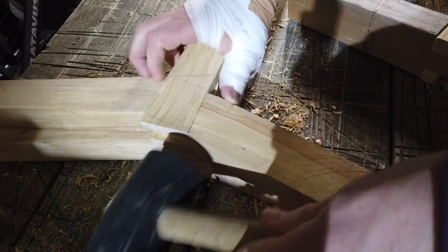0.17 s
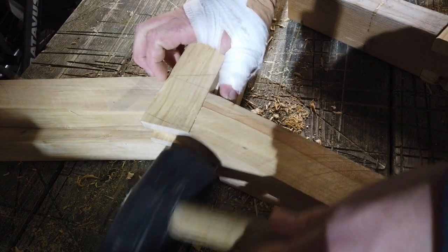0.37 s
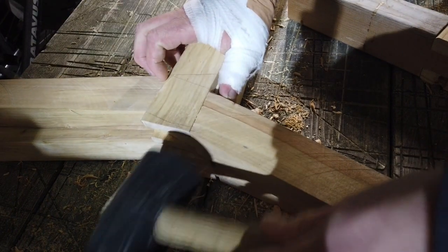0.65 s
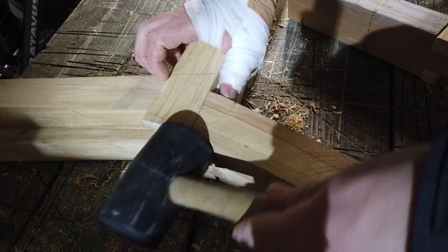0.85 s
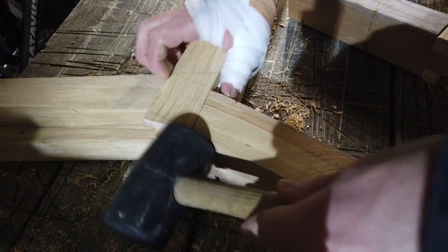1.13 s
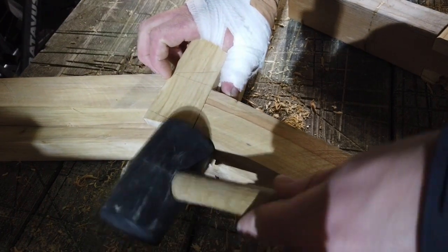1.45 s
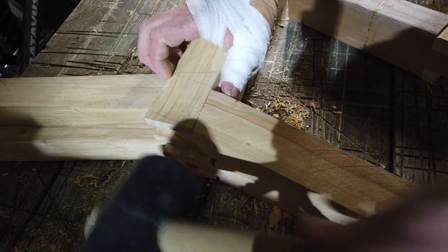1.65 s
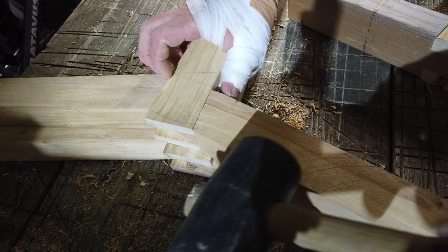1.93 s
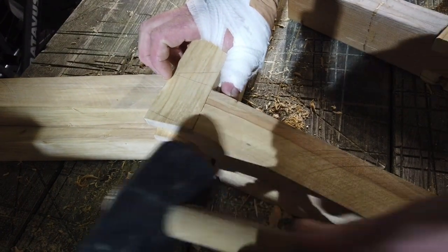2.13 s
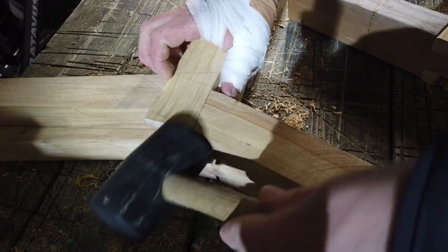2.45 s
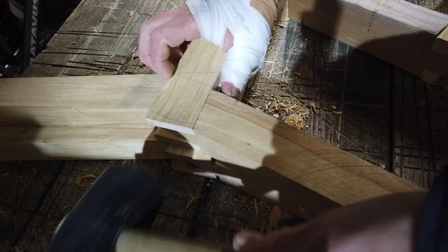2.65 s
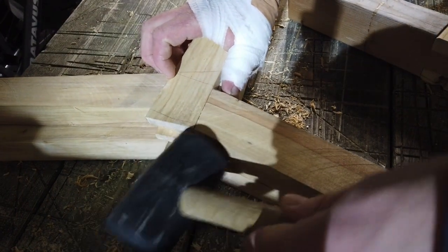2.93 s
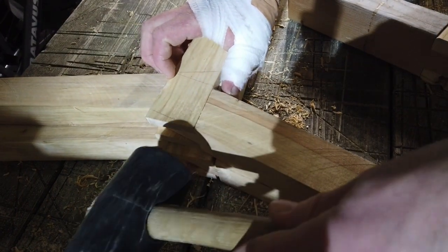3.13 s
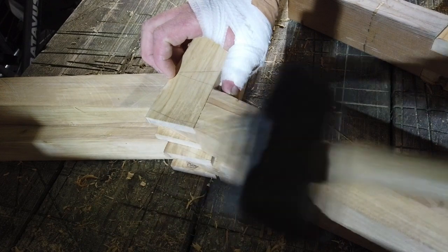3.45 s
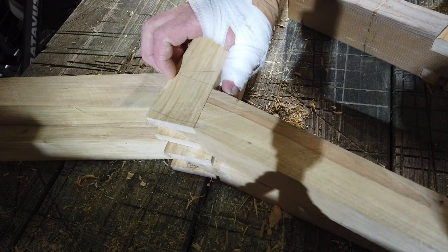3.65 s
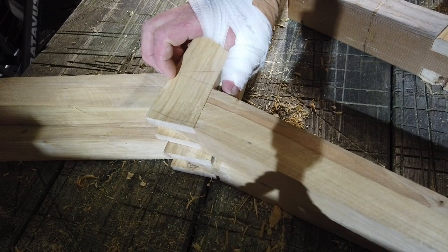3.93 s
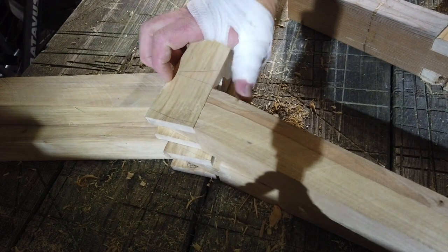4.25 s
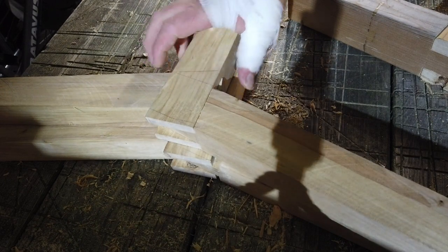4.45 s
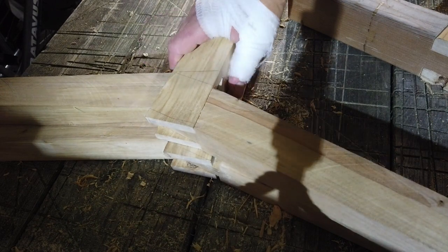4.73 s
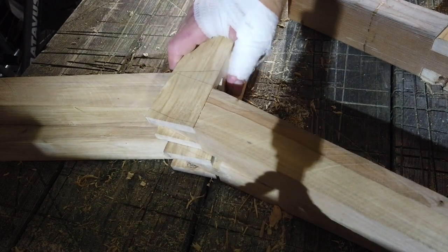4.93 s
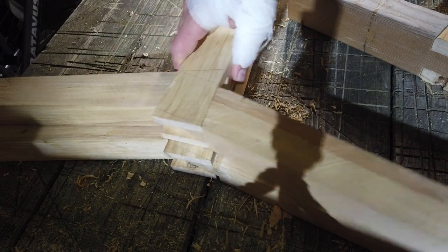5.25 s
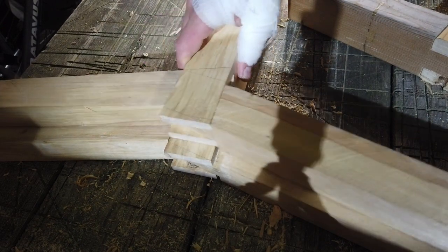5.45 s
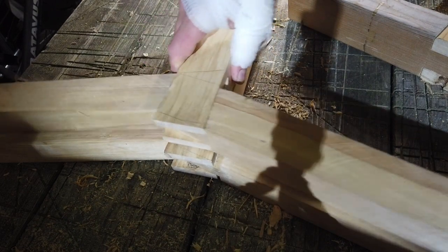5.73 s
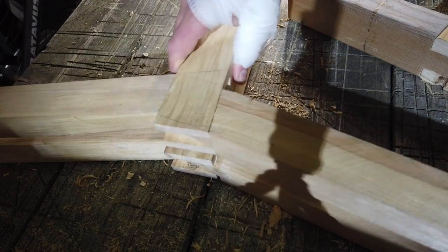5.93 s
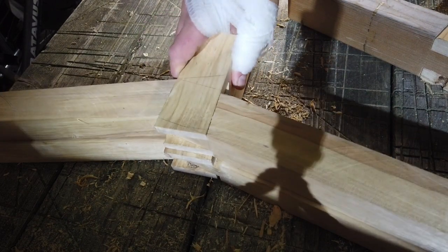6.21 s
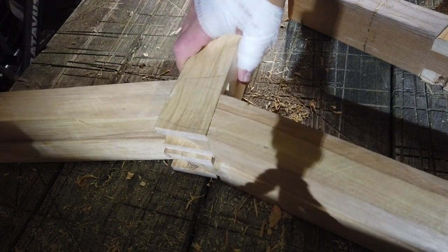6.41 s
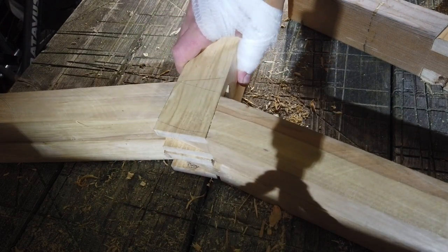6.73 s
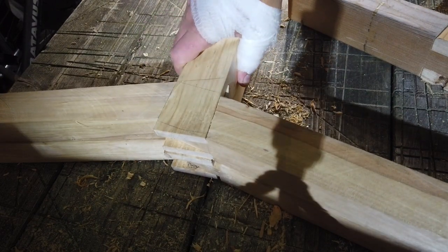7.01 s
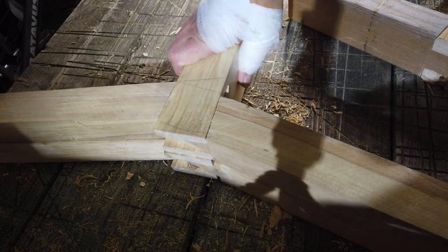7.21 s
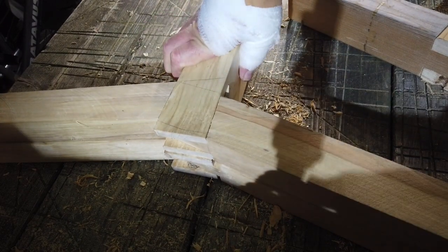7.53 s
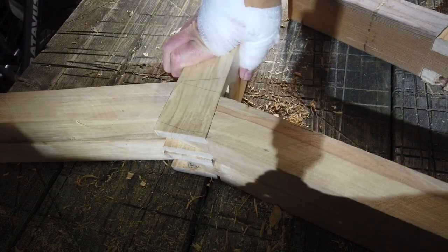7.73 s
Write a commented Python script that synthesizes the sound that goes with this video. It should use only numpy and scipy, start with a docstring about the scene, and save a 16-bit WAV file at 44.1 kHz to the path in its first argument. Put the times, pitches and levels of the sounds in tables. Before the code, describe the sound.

Close-up woodworking in a small, quiet workshop. A faint cloth rustle and low drag open, then a mallet drives a tight tenon into a frame: a softer knock at 0.14 s, then firm ones near 0.4, 0.65, 0.9, 1.2 and 1.5 s. Each is a short woody knock with a bench thud, gritty crack and bright snap that grows as the joint binds. Sleeve swishes and light ticks fill the gap; a softer but heavier-bodied blow at 2.5 s and a firm one at 2.95 s finish. A cloth swish passes at 3.5 s. At 4.1 s the frame thuds, clacking again at 4.5 s. Juddering drags and bumps run from 5 to 6 s, strongest about 5.5 s. It drops flat at 6.1-6.2 s in a loud double clack. Cloth swishes lead to a deep padded thump at 7.4 s, then faint rumble. Short reflections and faint metallic ringing follow the wood hits.

```python
"""A faint cloth rustle and a low drag over quiet room tone, then mallet blows drive a tight tenon into a frame.
Each blow layers a bouncing bench thud, ringing timber modes and a short stick-slip crack and snap.
Later the frame is shoved about and dropped back, with clacks, padded thumps and juddering scrapes.
Sleeve swishes are coloured noise that follows the arm's speed; folds of the jacket tick.
Decaying noise bands make the small workshop's reflections, and metal tools ring faintly along."""
import sys
import numpy as np
from scipy import signal
from scipy.fft import rfft, irfft, next_fast_len
from scipy.io import wavfile
from scipy.ndimage import uniform_filter1d

SR = 44100
rng = np.random.default_rng(int(sys.argv[2]) if len(sys.argv) > 2 else 0)


def wav_out(sig):
    """Save sig, one row per channel (or a flat mono array), as 16-bit PCM at SR to the path in sys.argv[1]."""
    wavfile.write(sys.argv[1], SR, np.round(np.clip(np.atleast_2d(sig).T, -1, 1) * 32767).astype(np.int16))


N = 347067  # samples
RING = np.arange(SR) / SR  # s, one second in which a contact dies away

# Colour of the room tone: f/Hz, relative level/dB
ROOM_TONE_COLOUR = [(12, -20), (20, 7.5), (61, -1.5), (284, -24), (365, -22), (843, -25), (969, -29.5),
                    (1600, -26.5), (3310, -31), (6290, -41), (11000, -37), (14500, -40.5), (15800, -42.5)]
ROOM_TONE_DB = -61.5
# Stereo width of handling noise and room tone: f/Hz, side against mid level/dB
NEAR_WIDTH = [(60, -11.5), (200, -15.5), (700, -10), (2400, -16), (4400, -9), (8000, -0.5), (15000, -9)]

# Shoves of the frame over the bench: t/s of top speed, speeding up/s, slowing down/s,
# rumble level/dB, scrape level/dB
SHOVES = [(0.04, 0.17, 0.15, -48, -62), (4.392, 0.016, .05, -58, -54), (5.05, .15, 0.21, -46, -76),
          (5.41, 0.13, 0.2, -45, -60), (5.54, 0.16, 0.078, -33.5, -54.5), (5.81, 0.41, 0.51, -41, -60),
          (6.429, .03, 0.096, -46, -63.5), (7.65, 0.75, 0.96, -53.5, -70.5)]
# Colour of the judder and of the gritty scrape: f/Hz, relative level/dB
RUMBLE_COLOUR = [(25, 8.5), (50, 2), (85, -1), (160, -9.5), (280, -23), (700, -75.5)]
SCRAPE_COLOUR = [(150, -17.5), (400, 2), (900, -8), (2500, -17), (6000, -33.5), (15000, -60)]
SPEED_POWER = 0.84  # a movement's loudness follows its speed to this power

# Arm movements that swish the sleeve: t/s of top speed, speeding up/s, slowing down/s, level/dB
SWISHES = [(0.08, .15, 0.38, -66.5), (1.875, 0.23, 0.16, -55), (2.15, 0.13, .25, -55.5),
           (3.495, 0.18, 0.35, -48.5), (4.149, 0.6, 0.47, -63), (4.979, 0.14, 0.11, -57),
           (5.58, 0.59, 0.91, -66), (5.89, 0.093, 0.086, -65), (6.919, 0.14, 0.21, -53),
           (7.209, .14, .33, -45.5), (7.46, 0.16, 0.33, -64), (7.83, 0.26, 0.27, -64)]
# Colour of the sliding cloth: f/Hz, relative level/dB
CLOTH_COLOUR = [(240, 1), (400, -9.5), (445, -6.5), (644, -1.5), (696, -10), (752, 3), (1050, -2.5),
                (1310, 1.5), (1920, -3.5), (2570, 2.5), (3140, 1), (6280, -9), (10900, -2.5), (14900, -6.5),
                (15800, -31.5)]

# The frame rocks and an edge knocks on the bench: t/s, knock level/dB, hardness/dB per octave,
# thud level/dB, thud f/Hz
BUMPS = [(0.009, -58.5, 1.5, -40, 183), (0.966, -38, -3, -37.5, 205), (1.582, -37.5, 1.1, -38.5, 62),
         (2.588, -42.5, 0.3, -36.5, 83), (4.117, -35, 0, -17.5, 159), (4.128, -46.5, 5.5, -27.5, 280),
         (4.164, -49, 5, -30, 128), (4.243, -36, 1.5, -34.5, 138), (4.508, -22, -1.5, -22.5, 146),
         (4.955, -59.5, 4, -47, 62), (5.011, -54.5, 0, -46, 62), (5.107, -58.5, 5, -41, 98),
         (5.377, -46, -0.15, -36.5, 86), (5.486, -39, 1.5, -29.5, 78), (5.518, -27.5, -1.7, -30, 167),
         (5.718, -36, 3.5, -47, 148), (5.835, -62, 6, -38.5, 165)]
# The frame falls flat, one end and then the other: same columns as BUMPS
DROP = [(6.120, -19.5, 1.5, -20.5, 167.3), (6.187, -28, 3, -25, 198), (6.198, -21.5, -2.2, -20.5, 112)]
# Mallet blows: t/s, force/dB against a full blow, thud level/dB, thud f/Hz
BLOWS = [(0.142, -7, -30, 161), (0.388, 0.5, -28, 127), (0.639, 0, -29, 126), (0.915, 1, -26, 122),
         (1.217, 1, -27.5, 110), (1.529, -0.5, -28.5, 138), (2.520, -6, -21.5, 114.5),
         (2.943, -0.5, -28.5, 205)]

# Resonances of bench and frame, retuned a little at each strike: f/Hz, relative level/dB, t60/s
BENCH_MODES = [(30.2, -22.5, 1), (44.56, -4, 0.69), (82.85, -2, 0.38), (106, -12, 0.073),
               (127, -2.5, 0.049), (161.7, 0, .26), (181.3, -7.5, 0.38), (203, -2.5, 0.17),
               (218.4, -14, 0.065)]
TIMBER_MODES = [(331, -8, 0.23), (396, -3.5, 0.21), (428.4, 1.5, 0.072), (478.3, -1.5, 0.092),
                (591, -1.5, 0.15), (631, -7, .12), (743, -14, .08), (814.3, 3, 0.077), (1120, -10, 0.037),
                (1262, -3, 0.11), (1444, -8.5, 0.089), (1520, -2.5, 0.22), (1464, 3, 0.092),
                (1830, -7, .09), (1924, -14.5, 0.24), (2306, 2, 0.1), (2610, -9.5, 0.069), (2810, -10, 0.2),
                (3270, -5, .05), (3500, -13, 0.04), (4180, 4, .04)]
# Bending waves along the planks: f/Hz, relative level/dB
PLANK_COLOUR = [(40, -7), (100, -1.5), (190, -4.5), (260, -14.5), (400, -25), (900, -50)]
# Timber knock, before hardness tilts it: f/Hz, relative level/dB
KNOCK_COLOUR = [(100, -25.5), (200, -3.5), (380, 2.5), (800, -2), (1400, -8.5), (2200, -12), (5000, -52.5),
                (15000, -82.5)]
# Loose wood clacking on the bench: f/Hz, relative level/dB
CLACK_COLOUR = [(500, -19.5), (1100, -7.5), (2300, 1.5), (3100, -4), (4000, -16.5), (5500, -36.5),
                (14000, -66)]
# Brighter crack of the joint, with a bite from the short tenon: f/Hz, relative level/dB
CRACK_COLOUR = [(600, -33), (1450, 3), (1850, 0), (2320, -0.5), (2650, -3), (3000, -4), (3270, 0.5),
                (3650, -9.5), (4060, -11.5), (5500, -27.5), (10000, -50.5)]
# Snap of the rubbing fibres: f/Hz, relative level/dB
SNAP_COLOUR = [(2000, -18), (4200, 1.5), (5500, -2), (8000, -8.5), (11000, -6), (16000, -21.5)]

# Levels of a full blow, the snap once the joint has bound
BLOW_KNOCK_DB, BLOW_CRACK_DB, BLOW_SNAP_DB = -26.5, -27.5, -37.5
# The tenon binds as it goes in, so the snap grows: shortfall at the start (dB), time to bind (s)
LOOSE_DB, BIND_S = -16, 0.17
# Loose wood: clack and snap against the knock (dB), and their rise with hardness (dB per dB/octave)
CLACK_DB, CLACK_PER_HARDNESS = -11.5, 2.96
EDGE_SNAP_DB, FLAT_SNAP_DB, SNAP_PER_HARDNESS = -20.5, -41.5, 4.17
# Heavier thuds chatter more: thud where chatter equals the slip before grip (dB), slope (dB per dB)
HEAVY_THUD_DB, CHATTER_GROWTH = -31, 0.58
# Heavier landings are shorter: contact at HEAVY_THUD_DB (s), dB of thud that halve it, longest (s)
CONTACT_S, CONTACT_HALVING_DB, LONGEST_CONTACT_S = 0.0052, 10, 0.009

# Workshop reverberation: f/Hz, relative level/dB, t60/s
ROOM = [(40.4, 8.5, 0.96), (83, -11, 0.44), (186, -9, 0.41), (500, -8, 0.16), (1500, -14.5, 0.31),
        (4000, -14.5, 0.25), (12000, -11, 0.024)]
# Stereo spread of reflections and of the direct sound's phase: f/Hz, relative level/dB
WIDTH = [(50, -2.5), (110, -12.5), (200, -16), (380, -12.5), (700, -12.5), (1300, -5.5), (2500, -2.5),
         (5000, 1.5), (12000, 5.5)]
# Metal tools nearby, ringing in sympathy: f/Hz, relative level/dB, t60/s
TOOL_MODES = [(1070, -9, 1), (1710, 1, 0.55), (2484, -0.5, .55), (2495, 5.5, 0.17)]

# Folds of the jacket flip over: t/s, level/dB
FOLDS = [(1.867, -51), (3.448, -47.5), (3.586, -52), (6.986, -51)]
# Dull tick of a fold: f/Hz, relative level/dB
FOLD_COLOUR = [(150, -19), (400, 0.5), (850, 1.5), (2200, -7.5), (5000, -29)]
# Padded thumps against the bench: t/s, level/dB, f/Hz, bounce/cycles
THUMPS = [(4.119, -24.5, 302, 0.37), (5.873, -38.5, 68.6, 1), (6.317, -37, 52.3, 1.6),
          (7.395, -15.5, 73.7, 0.94), (7.417, -30.5, 190, 0.77), (7.418, -39.5, 357, 0.3),
          (7.64, -49.5, 78.6, 1.4), (7.718, -48, 74.6, 0.92)]


def undb(db):
    """Decibels to gain."""
    return 10 ** (np.asarray(db) / 20)


def lookup(points, hz, axis=1):
    """Read a column of a table along log frequency."""
    table = np.array(points, float)
    return np.interp(np.log(np.maximum(hz, 1)), np.log(table[:, 0]), table[:, axis])


def colour(x, points):
    """Minimum-phase filter with the given f/Hz, level/dB shape, so nothing sounds ahead of its cause."""
    size = 2 * next_fast_len(x.shape[-1])
    gain = undb(lookup(points, np.fft.rfftfreq(size, 1 / SR)))
    cepstrum = irfft(np.log(gain))
    # folding the cepstrum forward makes the filter causal
    cepstrum[1:size // 2] *= 2
    cepstrum[size // 2 + 1:] = 0
    response = np.exp(rfft(cepstrum))
    return irfft(rfft(x, size) * response)[..., :x.shape[-1]]


def unit(x):
    """Scale to rms 1."""
    return x / np.sqrt(np.mean(x ** 2))


def loudest(x, db, size=882):
    """Scale so that the loudest 20 ms have this level."""
    power = uniform_filter1d(x ** 2, size, mode="constant")
    return x * undb(db) / np.sqrt(power.max())


def through(x, response):
    """Pass a sound through an impulse response."""
    return signal.fftconvolve(x, response)[:len(x)]


def add(track, s, sound):
    """Mix a sound into a track at time s."""
    start = max(int(s * SR), 0)
    track[start:start + len(sound)] += sound[:N - start]


def walk(rate):
    """Smoothed random drift with a spread near 1 and about this many steps a second."""
    k = int(SR / rate)
    steps = np.repeat(rng.standard_normal(N // k + 1), k)
    smooth = uniform_filter1d(uniform_filter1d(steps, k), k)
    return unit(smooth)[:N]


def stereo_noise(points):
    """Coloured noise whose two channels differ by NEAR_WIDTH."""
    mid, side = colour(rng.standard_normal((2, N)), points)
    spread = colour(side, NEAR_WIDTH) * np.array([[1], [-1]])
    return (mid + spread) / np.std(mid)


def room_tone():
    """Quiet coloured noise of the workshop, its level drifting slowly."""
    return stereo_noise(ROOM_TONE_COLOUR) * undb(ROOM_TONE_DB + 1.5 * walk(3))


def movement(s, rise_s, fall_s):
    """Gain of one movement, which speeds up smoothly from rest and slows to rest again."""
    t = np.arange(N) / SR - s
    progress = np.clip(np.where(t < 0, -t / rise_s, t / fall_s), 0, 1)
    return np.sinc(progress) ** (2 * SPEED_POWER)


def drag():
    """The frame judders over the planks and crunches grains of sawdust."""
    judder = sum(undb(db) * movement(*timing) for *timing, db, _ in SHOVES)
    scrape = sum(undb(db) * movement(*timing) for *timing, _, db in SHOVES)
    rumble = stereo_noise(RUMBLE_COLOUR) * judder * undb(2 * walk(20))
    # uneven sample levels make the noise gritty
    grains = rng.standard_normal(N) * np.exp(0.82 * rng.standard_normal(N))
    crunch = unit(colour(grains, SCRAPE_COLOUR))
    return rumble + crunch * scrape * undb(2.3 * walk(70))


def sleeve():
    """Smooth jacket cloth slides over itself, its weave hissing with a slight flutter."""
    swish = sum(undb(db) * movement(*timing) for *timing, db in SWISHES)
    return stereo_noise(CLOTH_COLOUR) * swish * undb(0.56 * walk(70))


def ring(modes):
    """Decaying modes of unit energy; pitch and weight vary with the spot that is struck."""
    hz, db, t60 = np.array(modes, float).T[:, :, None]
    shift, weight = rng.standard_normal((2, len(modes), 1))
    hz = hz * (1 + 0.01 * shift)
    db = db + 3 * weight
    decay = np.exp(-np.log(1000) * RING / t60)
    y = np.sum(undb(db) * decay * np.sin(2 * np.pi * hz * RING), 0)
    return y / np.linalg.norm(y)


def thud(hz, cycles, bench_db):
    """The struck mass bounces briefly on the planks and leaves the bench ringing."""
    phase = hz * RING  # cycles
    bounce = -np.sin(2 * np.pi * phase) * phase * np.exp(-phase / max(cycles, 0.2))
    return loudest(bounce, 0) + loudest(through(bounce, ring(BENCH_MODES)), bench_db)


def slips(length, grit, chatter_db, chatter_s, rise_s):
    """Surfaces stick and slip in a dense burst of tiny jerks, then chatter briefly."""
    jerks = rng.standard_normal(len(RING)) * np.exp(grit * rng.standard_normal(len(RING)))
    burst = 1 / (1 + (RING / max(length, 0.001)) ** 8)
    rattle = undb(chatter_db) * np.exp(-RING / chatter_s)
    return jerks * np.minimum(RING / rise_s, 1) * (burst + rattle)


def strike(levels_db, hardness_db, thud_hz, crack_colour, slip_s, chatter_db, chatter_s, rise_s,
           cycles, bench_db, plank_db, timber_db):
    """One contact: bench thud, timber knock, and crack and snap of rubbing faces, at these four levels."""
    force = slips(slip_s, 0.27, chatter_db, chatter_s, rise_s)
    # the main shove rings the frame alongside the gritty slip
    timber = undb(timber_db) * ring(TIMBER_MODES) * np.minimum(RING / rise_s, 1)
    wood = force / np.linalg.norm(force) + timber
    # a harder contact drives the higher modes more
    knock_colour = [(hz, db + hardness_db * np.log2(hz / 500)) for hz, db in KNOCK_COLOUR]
    knock = colour(wood, knock_colour)
    crack = colour(wood, crack_colour)
    fibres = slips(slip_s, 0.2, chatter_db - 6, 0.032, rise_s)
    snap = colour(fibres, SNAP_COLOUR)
    # bending waves run along the planks and come back jumbled
    jumble = rng.standard_normal(len(RING)) * RING * np.exp(-RING / 0.014)
    planks = colour(jumble, PLANK_COLOUR)
    low = loudest(thud(thud_hz, cycles, bench_db), 0) + loudest(planks, plank_db)
    return sum(loudest(part, db) for part, db in zip((low, knock, crack, snap), levels_db))


def chatter(thud_db):
    """Rattle after a thud in dB against the first slip; heavier thuds rattle more."""
    return CHATTER_GROWTH * (thud_db - HEAVY_THUD_DB)


def bump(knock_db, hardness_db, thud_db, thud_hz, snap_db):
    """Loose wood meets the bench; the harder the contact, the more it clacks and snaps."""
    clack_db = knock_db + CLACK_DB + CLACK_PER_HARDNESS * hardness_db
    fibre_db = knock_db + snap_db + SNAP_PER_HARDNESS * hardness_db
    contact_s = CONTACT_S * 2 ** ((HEAVY_THUD_DB - thud_db) / CONTACT_HALVING_DB)
    return strike((thud_db, knock_db, clack_db, fibre_db), hardness_db, thud_hz, CLACK_COLOUR,
                  slip_s=min(contact_s, LONGEST_CONTACT_S), chatter_db=chatter(thud_db),
                  chatter_s=0.019, rise_s=0.0014, cycles=1.0,
                  bench_db=-4.5, plank_db=-5.0, timber_db=-11.0)


def blow(s, force_db, thud_db, thud_hz, grip_db):
    """The mallet slips the tenon a little; its snap grows as the joint binds, and grip damps the chatter."""
    snap_db = BLOW_SNAP_DB + LOOSE_DB * np.exp(-s / BIND_S)
    levels_db = thud_db, BLOW_KNOCK_DB + force_db, BLOW_CRACK_DB + force_db, snap_db + force_db
    return strike(levels_db, hardness_db=0.7, thud_hz=thud_hz, crack_colour=CRACK_COLOUR,
                  slip_s=0.0057, chatter_db=chatter(thud_db) + grip_db,
                  chatter_s=0.017, rise_s=0.0048, cycles=0.43,
                  bench_db=3.0, plank_db=1.0, timber_db=-11.5)


def woodwork():
    """Edge bumps, mallet blows held short by the joint's grip, and the frame's flat drop."""
    track = np.zeros(N)
    for s, *row in BUMPS:
        add(track, s, bump(*row, EDGE_SNAP_DB))
    for s, *row in BLOWS:
        add(track, s, blow(s, *row, grip_db=-13))
    for s, *row in DROP:
        add(track, s, bump(*row, FLAT_SNAP_DB))
    return track


def close_by(x, scatter_db, lag_s):
    """Direct sound reaches the left channel a little later; the bench top scatters phase between the two."""
    size = next_fast_len(N)
    hz = np.fft.rfftfreq(size, 1 / SR)
    knots = np.linspace(0, SR / 2, 120)
    signs = np.interp(hz, knots, rng.choice([-1, 1], len(knots)))
    scatter = signs * undb(scatter_db + lookup(WIDTH, hz))
    phase = scatter + np.pi * hz * lag_s  # half the lag on each side
    turn = np.exp(1j * phase * np.array([[-1], [1]]))
    return irfft(rfft(x, size) * turn, size)[:, :N]


def workshop(x, wide_db, build_s):
    """Reflections build up within milliseconds; the bass lingers longest."""
    hz = np.fft.rfftfreq(len(RING), 1 / SR)
    noise = rfft(rng.standard_normal((2, len(RING))))
    build = 1 - np.exp(-(RING / build_s) ** 2)
    tail = 0
    for centre in 2. ** np.arange(5, 15):  # Hz, overlapping octave bands
        band = np.clip(1 - abs(np.log2(np.maximum(hz, 1) / centre)), 0, 1)
        decay = np.exp(-np.log(1000) * RING / lookup(ROOM, centre, axis=2))
        echoes = irfft(noise * band, len(RING)) * decay * build
        echoes = echoes / np.linalg.norm(echoes, axis=1, keepdims=True)
        tail = tail + undb(lookup(ROOM, centre)) * np.sqrt(np.mean(band ** 2)) * echoes
    mid = through(x, tail[0])
    side = through(x, undb(wide_db) * colour(tail[1], WIDTH))
    return np.array([mid + side, mid - side])


def tools(wood):
    """Metal tools nearby ring faintly in sympathy with the woodwork."""
    return undb(-36) * through(wood, ring(TOOL_MODES))


def folds():
    """A fold of stiff cloth flips over with a dull tick."""
    track = np.zeros(N)
    for s, db in FOLDS:
        flip = slips(length=0.0055, grit=0.55, chatter_db=-1, chatter_s=0.02, rise_s=0.001)
        add(track, s, loudest(colour(flip, FOLD_COLOUR), db))
    return track


def thumps():
    """Padded bumps are too slow to ring the frame; they come through the planks."""
    track = np.zeros(N)
    for s, db, hz, cycles in THUMPS:
        add(track, s, loudest(thud(hz, cycles, bench_db=-19), db))
    return track


def scene():
    """Room tone, handling sounds, and close woodwork with its reverberation and ringing tools."""
    handling = room_tone() + drag() + sleeve()
    wood = woodwork()
    direct = close_by(wood, scatter_db=-2.5, lag_s=0.000016)
    reflections = workshop(wood, wide_db=-8.0, build_s=0.009)
    return handling + direct + reflections + tools(wood) + folds() + thumps()


def record(dry):
    """The microphone loses the deepest bass and the top of the treble."""
    low_cut = signal.butter(2, 22, "high", fs=SR, output="sos")
    top_cut = signal.ellip(10, 0.2, 80, 15900, fs=SR, output="sos")
    return signal.sosfilt(top_cut, signal.sosfilt(low_cut, dry))


dry = scene()
out = record(dry)
wav_out(out)
```